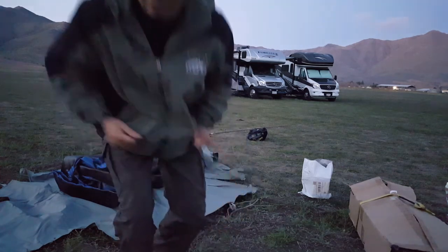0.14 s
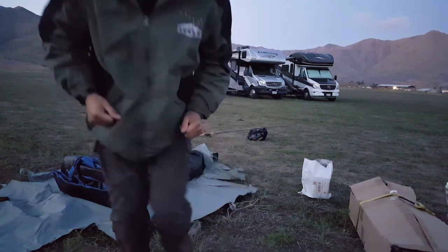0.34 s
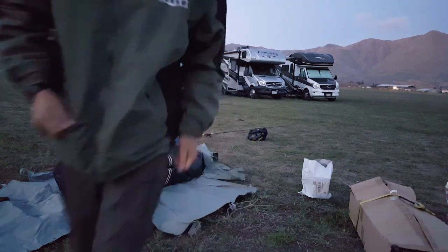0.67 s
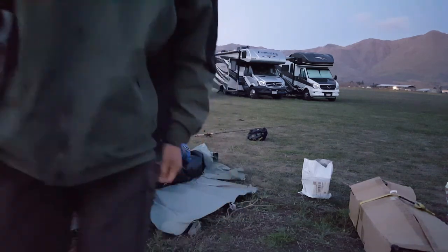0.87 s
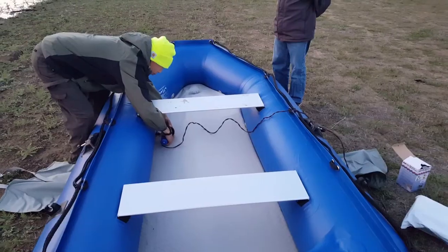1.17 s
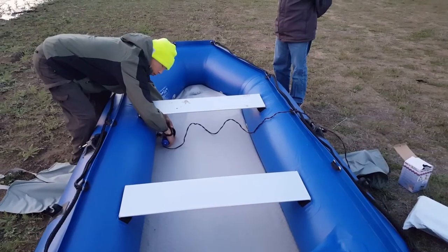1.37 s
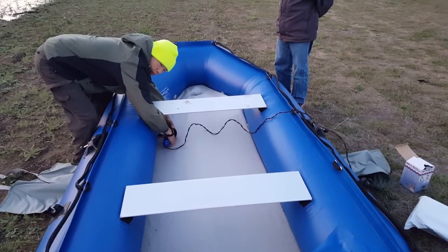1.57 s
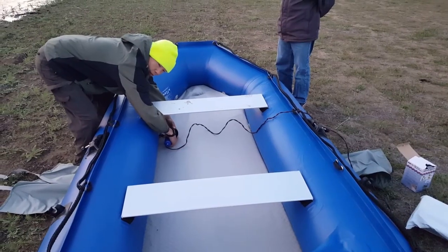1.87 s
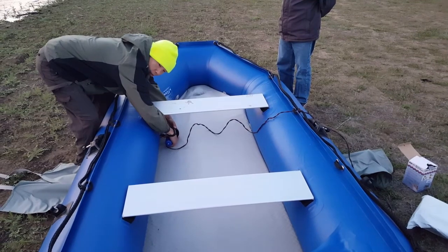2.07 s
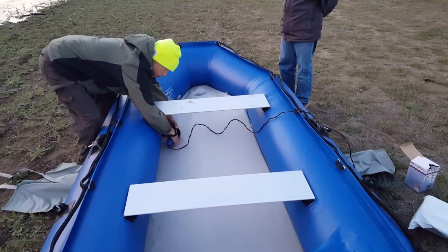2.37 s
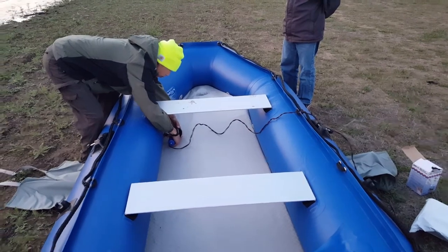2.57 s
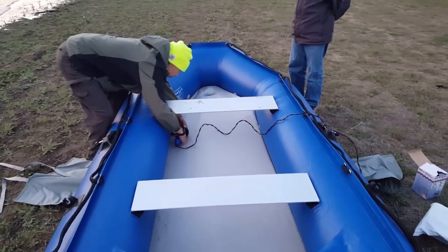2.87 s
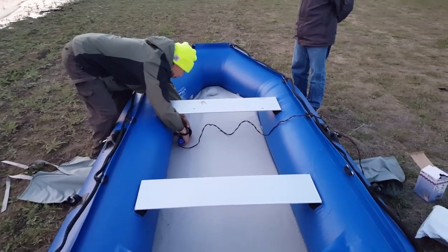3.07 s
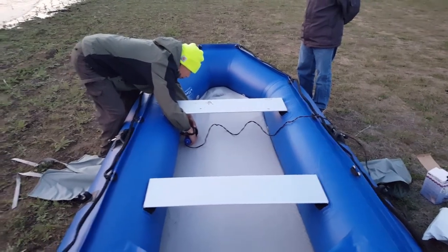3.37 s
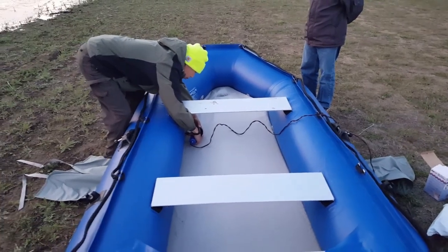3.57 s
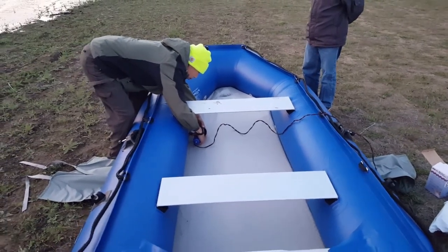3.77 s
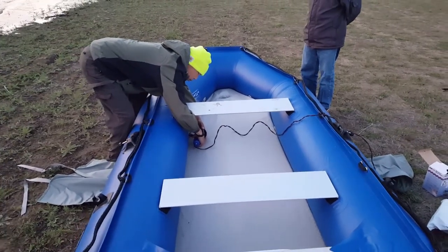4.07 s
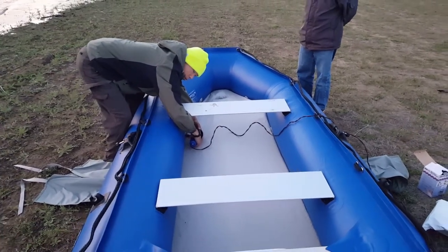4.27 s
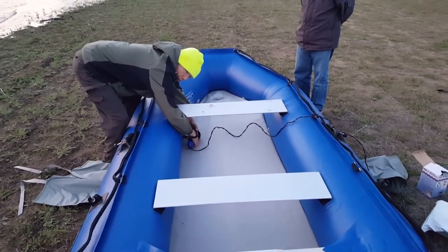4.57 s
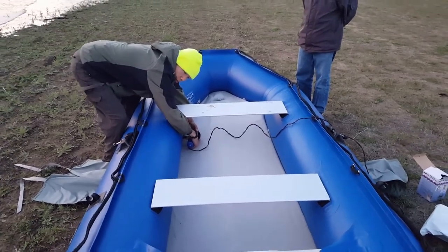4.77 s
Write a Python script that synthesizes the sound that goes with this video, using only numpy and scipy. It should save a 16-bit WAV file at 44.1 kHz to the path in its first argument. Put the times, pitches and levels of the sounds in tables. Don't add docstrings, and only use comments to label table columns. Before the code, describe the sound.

Open field, close hand-held stereo. From 0 to 1.1 s it is quiet: low outdoor air, clothing brushing at about 0.3, 0.5 and 0.8 s, a cluster of dull steps and knocks on a tarpaulin at 0.15-0.33 s, a bright dry tick near 0.58 s, and more soft knocks at 0.75-0.9 s. After a tiny near-silent gap, at 1.12 s a small electric blower cuts in abruptly, far louder and already at speed. A piercing main whine near 5.7 kHz, with lower hums and thinner whistles above 11 kHz, creeps up barely in pitch, fading and beating separately left and right as the view sways. Turbulent air booms hollowly in the rubber hull, with a rough nozzle whistle and a hose tone surging more strongly after 2.4 s. Low wind flutters throughout, with dull pops mostly left, especially at 3.2-3.7 s. The blower is still running at the end.

```python
import sys
import numpy as np
from scipy import signal
from scipy.fft import rfft, irfft, next_fast_len
from scipy.io import wavfile
from scipy.ndimage import map_coordinates

SR = 44100
rng = np.random.default_rng(int(sys.argv[2]) if len(sys.argv) > 2 else 0)


def materialize(psi):
    bounded = np.clip(np.atleast_2d(psi).T, -1, 1)
    quanta = np.round(bounded * 32767).astype(np.int16)
    wavfile.write(sys.argv[1], SR, quanta)


def decibels_to_gain(level_db):
    exponent = np.asarray(level_db, float) / 20
    return 10 ** exponent


N = 217796

CUT_OUT_S, CUT_IN_S = 1.1125, 1.1242
TURN_S = (2.1, 3.3)

# frequency in Hz, left and right in dB per Hz, left-right likeness.
FIELD_COLOUR = [(30, -99, -86, 0.18), (59.6, -77, -75, 0.95), (98, -73, -74, 0.9), (161, -81, -81.5, 0.92),
                (400, -82.5, -83, 0.86), (804, -85.5, -86.5, 0.41), (1810, -89, -92.5, 0.045),
                (3420, -99.0, -99, -0.4), (4960, -100, -101, -0.63), (7160, -101, -104, -0.53),
                (8600, -102, -108, 0.15), (10000, -110, -118, 0.17), (13500, -108.4, -112, -0.081),
                (14400, -107, -110, -0.13)]
# time in seconds, half-length in seconds, peak in dB.
RUSTLES = [
    (.03, 0.04, -72),
    (.3, 0.016, -68),
    (.35, 0.035, -72.5),
    (.49, 0.048, -72.5),
    (.578, 0.0041, -73),
    (.75, 0.041, -68),
    (.83, 0.052, -68.5),
    (1.06, 0.056, -70.5),
]
# time in seconds, peak in dB, ring in Hz, left over right in dB.
KNOCKS = [(.1420, -39, 600, 1), (.1688, -43, 1150, 1.5), (.2395, -45, 380, 1), (.2862, -43, 1500, 1.5),
          (.2912, -39.5, 520, 1.5), (.2965, -42, 520, 1.5), (.3090, -42, 400, 1), (.3310, -43, 380, .5),
          (.5765, -46, 1300, 0), (.2925, -47, 4500, 1), (.858, -44, 750, 0), (.742, -46, 250, 0),
          (.842, -44, 420, 0), (.892, -45, 520, 0)]
# time in seconds, peak in dB, ring in Hz, left over right in dB.
TWANGS = [
    (.166, -46, 1250, 1.5),
    (.2, -50, 1400, 1),
    (.828, -48, 1750, 0),
    (.834, -48, 1780, 0),
]
# time in seconds, peak in dB.
TICKS = [
    (.5755, -45),
]

# frequency in Hz, left and right in dB per Hz, left-right likeness.
WIND_COLOUR = [(14.2, -94, -94, .3), (33.2, -93, -94, -0.14), (60, -88, -84, 0.2),
               (102, -81.5, -82.5, 0.062), (140, -85.5, -87.5, 0.16), (173, -86.5, -88.5, 0.17),
               (272, -87.5, -90, 0.45), (330, -90.5, -99, .4), (395, -105.5, -109.5, 0.31)]
# time in seconds, peak in dB, left over right in dB.
GUSTS = [(1.2, -60, -4), (1.46, -58.5, -14), (1.63, -59, -7), (1.87, -67.5, -14), (1.98, -62, -18),
         (2.32, -64, 7), (2.5, -73, 5), (2.75, -64, 16), (2.85, -53.5, -2), (2.97, -57, 1), (3.2, -73, 10),
         (3.31, -58, 14), (3.41, -55.5, 10), (3.56, -57, 8), (3.7, -60, 3), (3.83, -64, 3), (3.93, -61, -2),
         (4.14, -61, -7), (4.25, -57.5, -5), (4.46, -55.5, 6), (4.68, -65, -9), (4.87, -59, -8)]
# time in seconds, half-length in seconds, depth in dB.
LULLS = [
    (1.362, .04, 4),
    (1.737, 0.05, 11),
    (2.123, 0.045, 14),
    (2.55, .04, 11),
    (3.1, 0.057, 12),
    (4.0, .04, 4),
    (4.603, .04, 6),
    (4.75, 0.041, 26),
]
# time in seconds, peak in dB, ring in Hz, left over right in dB.
POPS = [(1.5, -52, 190, 14), (2.01, -52, 201, 12), (2.86, -55, 180, 12), (3.198, -46, 220, 20),
        (3.265, -43.5, 225, 27.5), (3.3, -52, 420, 15), (3.41, -51, 250, 27), (3.529, -46, 190, 14),
        (3.569, -51, 211, 12), (3.614, -49.5, 191, 24), (3.69, -42, 180, 18), (3.74, -53, 300, 15)]

# frequency in Hz, left and right in dB per Hz, left-right likeness.
AIR_COLOUR = [(387, -86, -84, 0.72), (540, -79.5, -80.5, 0.91), (754, -69.5, -69.5, 1),
              (1060, -77, -76, 0.99), (1348, -72.5, -70.5, 0.98), (1576, -81, -78, 0.47),
              (1680, -79, -79, .5), (1850, -75.5, -76.5, 0.89), (2390, -74.5, -75, 0.68),
              (3290, -75, -76.5, 0.78), (3520, -80, -78, 0.46), (3930, -81.5, -83.5, 0.11),
              (6460, -85.5, -78, 0.58), (8150, -77.5, -87, 0.19), (9380, -90.5, -111, 0.15),
              (11900, -85, -98, 0.36), (13260, -84.5, -86, 0.28)]
# time in seconds, level in dB.
FLOW = [(1.13, -50.5), (1.66, -44), (1.75, -48), (2.2, -47), (2.7, -46), (2.99, -45), (3.18, -47.5),
        (3.21, -44), (3.92, -43.5), (4.11, -47.5), (4.3, -45), (4.33, -52), (4.41, -42.5), (4.93, -46)]
FLOW_SHARES = [0.93, 0.026, 0.021, 0.16]
# time in seconds, half-length in seconds, rise in dB.
ROAR_SWELLS = [
    (1.58, 0.074, 0.5),
    (3.59, 0.16, 3.5),
    (3.1, 0.12, 0),
    (4.6, 0.18, -1.5),
]
# time in seconds, lag in samples.
AIR_LAG = [(1.1, 2.9), (3.0, 2), (3.5, 0.61), (4.9, 2.7)]
# time in seconds, level in dB.
NOZZLE = [(1.1, -47), (2.4, -50), (3.0, -50), (4.9, -52)]
# time in seconds, pitch in Hz, steady level in dB.
HOSE = [(1.13, 1152, -60), (1.32, 1146, -54), (1.44, 1170, -58), (1.54, 1140, -54), (1.68, 1140, -53),
        (1.94, 1156, -54), (2.36, 1138, -64), (2.48, 1158, -61), (2.7, 1138, -53), (2.9, 1153, -54.5),
        (3.5, 1150, -49.5), (3.9, 1149, -49.5), (4.15, 1154, -49.5), (4.5, 1157, -47), (4.94, 1157, -50.5)]
# time in seconds, peak in dB.
SURGES = [(1.27, -48), (1.33, -45), (1.365, -50), (1.41, -55), (1.53, -46), (1.6, -45), (1.69, -47),
          (1.76, -48), (2.125, -43.5), (2.22, -46), (2.38, -44.5), (2.47, -41.5), (2.63, -41.5),
          (2.69, -42.5), (2.79, -47), (2.94, -40.5), (3.06, -54), (3.15, -42), (3.26, -39.5), (3.31, -42),
          (3.385, -46), (3.47, -44), (3.55, -49), (3.61, -40.5), (3.67, -41), (3.73, -47), (3.796, -40),
          (3.91, -41.5), (3.97, -37.5), (4.08, -45), (4.27, -43), (4.36, -43.5), (4.45, -37), (4.42, -46),
          (4.55, -39.5), (4.58, -48), (4.66, -48), (4.719, -40.5), (4.83, -44), (4.93, -45)]
# time in seconds, level in dB.
HALO = [
    (1.13, -65),
    (1.3, -52),
    (1.65, -48.5),
    (1.9, -55),
    (2.45, -52.5),
    (2.8, -52.5),
    (4.94, -51),
]

# time in seconds, base rate in Hz.
SPEED = [(1.14, 140.73), (1.34, 140.94), (1.54, 141.23), (1.74, 141.52), (2.14, 141.99), (2.34, 142.28),
         (2.54, 142.52), (2.73, 142.73), (2.93, 142.95), (3.13, 143.2), (3.53, 143.48), (3.73, 143.68),
         (4.13, 143.93), (4.33, 144.07), (4.53, 144.21), (4.73, 144.39), (4.85, 144.47), (4.93, 144.43)]
# order, left and right level in dB, left lead in radians, waver in dB.
ORDERS_WEAK = [
    (1.5, -63.5, -62, .3, 2.4),
    (2, -60, -58.5, .15, 1.4),
    (5, -60, -60, 0, 2),
    (20, -58, -58.5, 1.5, 2.5),
    (25, -65, -64, 0, 2.5),
    (45, -68, -63, 2.3, 2.5),
    (34, -70, -62, 1.9, 4),
]
# order, left and right level in dB, left lead in radians before and after the turn.
ORDERS_STRONG = [
    (10, -46.5, -47.5, -.15, 1.7),
    (15, -49.5, -50, .5, -.1),
    (16, -53.5, -51, 1.2, .6),
    (18, -53, -54, .5, .9),
]
# start in seconds, end in seconds.
LEAD_SWINGS = [(3.3, 4), (1.7, 8.4), (1.4, 2.6), (4.3, 4.9)]
# order, time and half-length in seconds, left and right loss in dB.
SHADES = [(10, 1.2, .25, 4, 13), (10, 2.1, .2, -1, 3), (10, 4.2, .4, 1, 4), (10, 4.85, .2, -3, 7),
          (10, 2.4, .1, 2, 2), (15, 1.2, .4, 2, 12), (15, 2.5, .5, 4, 8), (15, 2.0, .15, -4, 0),
          (15, 3.15, .12, 2, 4), (15, 3.7, .3, -1, -1), (15, 4.1, .3, 2, 4), (15, 4.65, .25, 6, 5),
          (16, 1.3, .3, 10, 6), (16, 2.0, .5, 3, 2), (16, 3.35, .12, -3, -2), (16, 4.3, .15, 2, 6),
          (16, 4.75, .2, 1, 4), (18, 1.5, .15, 4, 4), (18, 2.7, .3, 5, 5), (18, 4.2, .4, 4, 4),
          (18, 4.9, .3, 1, 3)]
# time in seconds, level in dB.
LATE_ORDER = [(1.2, -66), (2.8, -65), (3.3, -61), (4.0, -62), (4.3, -56), (4.9, -56)]
# time in seconds, left and right level in dB, left lead in radians.
HIGH_80 = [(1.13, -43, -62, -1.8), (1.27, -42, -62, -2.2), (1.45, -49, -53, -2.2), (1.57, -45, -50, -2.8),
           (1.72, -41, -56, -1.4), (1.89, -45, -44, -0.3), (2.2, -49, -45, -1.0), (2.45, -43, -42, -1.0),
           (2.7, -45, -53, -0.6), (2.74, -47, -55, 2.4), (2.82, -54, -49, 2.8), (2.9, -43, -51, 2.9),
           (3.34, -47, -46, 1.4), (3.42, -46, -52, 0.8), (3.51, -42, -49, 0.3), (3.61, -41, -61, 0.8),
           (4.09, -40, -46, 2.8), (4.55, -44, -54, 1.4), (4.7, -44, -51, 2.1), (4.79, -48, -55, 3.0),
           (4.87, -52, -48, 3.2), (4.93, -51, -53, 2.8)]
# time in seconds, left and right level in dB, left lead in radians.
HIGH_90 = [(1.13, -48, -59, 0.7), (1.42, -45, -49, 2.0), (1.56, -42, -57, 1.3), (1.96, -47, -50, 2.6),
           (2.23, -50, -56, 1.7), (2.29, -46, -63, 1.9), (2.63, -44, -52, 1.9), (2.86, -47, -59, 0.4),
           (3.04, -54, -64, 1.4), (3.11, -64, -64, 1.3), (3.21, -58, -56, 1.2), (3.28, -64, -64, 0.7),
           (3.36, -58, -58, 3.3), (3.52, -51, -64, 3.6), (3.71, -58, -51, 5.3), (3.83, -50, -53, 5.4),
           (4.09, -48, -48, 6.6), (4.41, -62, -48, 6.4), (4.56, -52, -49, 6.0), (4.76, -55, -49, 7.2),
           (4.87, -64, -48, 6.1), (4.93, -62, -47, 5.7)]
# time in seconds, left and right level in dB.
SWAY = [(1.132, -37.4, -38.3), (1.279, -39.9, -35.7), (1.52, -41.2, -43.2), (1.707, -42.0, -39.1),
        (1.841, -53.6, -35.8), (2.09, -34.5, -37.8), (2.309, -44.5, -32.5), (2.521, -40.6, -33.0),
        (2.648, -41.0, -30.0), (2.856, -42.4, -34.6), (3.099, -52.0, -33.5), (3.314, -44.5, -31.0),
        (3.514, -52.3, -38.6), (3.716, -41.6, -40.3), (4.11, -41.8, -35.1), (4.264, -43.1, -35.9),
        (4.639, -43.3, -35.4), (4.939, -51.6, -42.2)]
# time in seconds, lead in radians.
WHINE_LEAD = [(1.135, -1.5), (1.296, -2.8), (1.48, -2.4), (1.54, 1.6), (1.755, 1.0), (1.9, -6.8),
              (2.086, -9.3), (2.219, -10.8), (2.326, -15.4), (2.52, -15.8), (2.826, -16.9), (2.861, -18.0),
              (2.96, -21.0), (3.036, -26.5), (3.122, -28.0), (3.4, -27.8), (3.556, -25.3), (3.686, -29.1),
              (3.745, -29.7), (4.052, -29.5), (4.2, -29.2), (4.527, -29.5), (4.917, -30.0)]
# time in seconds, echo over direct in dB.
NULLS_LEFT = [(1.143, -18.5), (1.227, -22.0), (1.403, -7.1), (1.732, -1.9), (1.799, -22.0), (1.859, -4.5),
              (1.967, -20.0), (2.289, -17.2), (2.364, -8.9), (2.618, -13.8), (2.769, -5.3), (2.861, -15.1),
              (3.0, -15.4), (3.063, -2.3), (3.186, -0.8), (3.198, -12.5), (3.44, -3.0), (3.662, -15.7),
              (4.105, -1.4), (4.357, -22.0), (4.416, -2.6), (4.667, -11.7), (4.717, -5.7), (5.087, -0.3)]
# time in seconds, echo over direct in dB.
NULLS_RIGHT = [(0.883, -19.2), (1.256, -0.3), (1.486, -0.9), (1.806, -3.4), (2.003, -20.3), (2.077, -0.3),
               (2.317, -2.7), (2.534, -10.8), (2.655, -8.8), (2.837, -0.6), (3.004, -22.0), (3.13, -8.2),
               (3.227, -19.8), (3.464, -17.1), (3.577, -14.2), (3.618, -9.2), (3.885, -9.4), (4.045, -13.5),
               (4.209, -11.1), (4.519, -8.5), (4.728, -11.7), (4.795, -5.1), (5.033, -0.3)]
# frequency in Hz, left and right gain in dB.
PORTS = [(4600, 0, 0), (5100, 0, 3), (5600, 0.5, 1.1), (5800, 0.7, 0.3), (5960, 3.5, 0.0), (6220, 7.0, 0.5),
         (6610, 2.0, -1.5), (6960, -2.5, 1.5), (7080, -0.5, 5.0), (7280, 4.0, 2.5), (7620, 0.5, -2.5),
         (7950, 1.5, 1.5), (8420, 1.5, 1.0), (8720, 3.0, -10.5), (9020, 3.5, -12.5), (9220, 2.0, -9.5),
         (9430, -3.5, -16.5), (9670, -0.5, -4.0), (9910, -3.0, -10.5), (10120, -6.5, -5.0),
         (10310, -4.5, -10.0), (10490, 2.0, -11.5), (10900, -3.5, -20.5), (10960, -4.0, -18.0),
         (11050, -3.5, -7.0), (11130, -1.5, -4.0), (11630, -1.5, -5.0), (11910, -7.0, -5.5),
         (12300, -5.0, -13.5), (12450, -4.0, -7.0), (13240, -0.5, 2.0), (14380, 5.0, 0.5)]


def in_time(rows):
    s, *columns = np.transpose(rows)
    return np.array([np.interp(np.arange(N) / SR, s, c) for c in columns])


def drift(rate):
    r = np.exp(-80 * np.pi * rate / SR)
    noise = rng.standard_normal(N // 40 + 2002)
    slow = signal.lfilter([1], [1, -2 * r, r * r], noise)[2000:]
    return np.interp(np.arange(N) / 40, np.arange(len(slow)), slow / slow.std())


def bell(s, half_s):
    return np.exp(-((np.arange(N) / SR - s) / half_s) ** 2)


def swells(events, bed_db):
    power = sum(decibels_to_gain(db) ** 2 * bell(s, half_s) for s, half_s, db in events)
    return 10 * np.log10(decibels_to_gain(bed_db) ** 2 + power)


def turned(before, after):
    return np.interp(np.arange(N) / SR, TURN_S, [before, after])


def take(second):
    cut = round(CUT_IN_S * SR)
    return slice(cut - 20, N) if second else slice(0, cut)


def band_pass(x, low_hz, high_hz):
    return signal.sosfilt(signal.butter(2, [low_hz, high_hz], "band", fs=SR, output="sos"), x)


def coloured(colour, zones_hz, zones_db, patchy_db, flicker_hz, span, pan_db=0):
    count = span.stop - span.start
    size = next_fast_len(count)
    octave = np.log2(np.fft.rfftfreq(size, 1 / SR) + 1)
    at, *columns = np.transpose(colour)
    at = np.log2(at)
    left, right, alike = [np.interp(octave, at, c) for c in columns]
    alike = np.clip(alike, -1, 1)
    mid, side = rfft(rng.standard_normal((2, size)))
    pair = np.sqrt(1 + alike) * mid + np.sqrt(1 - alike) * side * [[1], [-1]]
    pair = pair * decibels_to_gain(np.array([left, right])) * np.sqrt(SR / 4)
    inside = np.clip(np.minimum(octave - at[0], at[-1] - octave) * 5 + 1, 0, 1)
    change_db = zones_db[:, span] - zones_db[:, span].mean(axis=1, keepdims=True)
    out = np.zeros((2, N))
    for centre in np.arange(at[0], at[-1] + .5, .5):
        share = np.clip(1 - 2 * np.abs(octave - centre), 0, 1)
        weights = [np.interp(centre, np.log2(zones_hz), row) for row in np.eye(len(zones_hz))]
        level_db = weights @ change_db + patchy_db * drift(flicker_hz)[span]
        out[:, span] += decibels_to_gain(level_db) * irfft(pair * inside * share, size)[:, :count]
    return out * decibels_to_gain(pan_db * np.array([[.5], [-.5]]))


def bumps(events, decay_s, spread):
    out, t = np.zeros((2, N)), np.arange(2200) / SR
    for s, db, hz, pan_db in events:
        puff = rng.standard_normal((2, len(t))) * np.exp(-t / decay_s)
        click = 12.0 * (t == 0)
        body = band_pass(puff[0] + .4 * puff + click, hz / spread, hz * spread)
        sides = decibels_to_gain(db + pan_db * np.array([[.5], [-.5]]))
        out[:, round(s * SR):][:, :len(t)] += sides * body / np.abs(body).max()
    return out


def passer_by():
    rustle_db = swells(RUSTLES, bed_db=-78)
    rumble_db = 5 * np.arange(N) / SR
    levels_db = np.array([rumble_db, 0.18 * rustle_db, rustle_db])
    return coloured(FIELD_COLOUR, [80, 800, 7000], levels_db, 0.88, 22, take(False))


def knocks():
    out = bumps(KNOCKS, .003, 1.5) + bumps(TWANGS, .005, 1.12)
    t = np.arange(600) / SR
    for s, db in TICKS:
        tick = band_pass(rng.standard_normal((2, len(t))), 5000, 10500) * np.exp(-t / 0.0035)
        out[:, round(s * SR):][:, :len(t)] += decibels_to_gain(db - 4) * tick
    return out


def wind():
    left, right = [swells([(s, 0.054, db + side * pan_db) for s, db, pan_db in GUSTS], bed_db=-60)
                   for side in (.5, -.5)]
    lull_db = sum(db * bell(s, half_s) for s, half_s, db in LULLS)
    level_db = (left + right) / 2 - lull_db
    pan_db = left - right
    return coloured(WIND_COLOUR, [100], level_db[None], 3.5, 12, take(True), pan_db - np.mean(pan_db))


def wind_pops():
    return bumps(POPS, 0.013, 1.5)


def airflow():
    levels_db = np.outer(FLOW_SHARES, in_time(FLOW)[0])
    levels_db[1] += sum(db * bell(s, half_s) for s, half_s, db in ROAR_SWELLS)
    levels_db[:3] += 0.96 * drift(35)
    pan_db = turned(-0.9, -2)
    left, right = coloured(AIR_COLOUR, [760, 2300, 3500, 7500], levels_db, 0.75, 21.0, take(True),
                           pan_db - pan_db.mean())
    heard_at = np.arange(N) - in_time(AIR_LAG)[0]
    return np.array([left, map_coordinates(right, [heard_at], order=3, mode="nearest")])


def nozzle():
    noise = rng.standard_normal((2, N))
    rush = band_pass(noise[0] + .5 * noise, 2400, 2620)
    return decibels_to_gain(in_time(NOZZLE)[0]) * rush / rush.std()


def order(turns, multiple, levels_db, lead):
    phase = 2 * np.pi * (multiple * turns + rng.random())
    return np.sqrt(2) * decibels_to_gain(levels_db) * np.array([np.sin(phase + lead), np.sin(phase)])


def hose_tone():
    hz, steady_db = in_time(HOSE)
    level_db = swells([(s, 0.022, db) for s, db in SURGES], steady_db)
    turns = np.cumsum(hz + 3.17 * drift(20.0)) / SR
    tone = order(turns, 1, level_db + 0.4 * drift(3.9) + [[-.6], [.6]], 0.084)
    halo = band_pass(rng.standard_normal(N), 1115, 1190)
    return tone + decibels_to_gain(in_time(HALO)[0]) * halo / halo.std()


def weak_orders(turns):
    late_db = in_time(LATE_ORDER)[0] + 3.0 * drift(9)
    out = order(turns, 36, late_db + [[-9], [0]], 1.9)
    for multiple, left_db, right_db, lead, waver_db in ORDERS_WEAK:
        waver = waver_db * (drift(3) + .5 * np.array([drift(2), drift(2)]))
        out += order(turns, multiple, waver + [[left_db], [right_db]], lead + .2 * drift(1))
    return out


def strong_orders(turns):
    out = np.zeros((2, N))
    for (multiple, left_db, right_db, *lead), swing_s in zip(ORDERS_STRONG, LEAD_SWINGS):
        loss_db = sum(np.outer(loss, bell(s, half_s)) for k, s, half_s, *loss in SHADES if k == multiple)
        levels_db = 0.8 * drift(6.9) + [[left_db], [right_db]] - loss_db
        out += order(turns, multiple, levels_db, np.interp(np.arange(N) / SR, swing_s, lead))
    return out


def high_whines(turns):
    out = np.zeros((2, N))
    for multiple, rows in ((80, HIGH_80), (90, HIGH_90)):
        *levels_db, lead = in_time(rows)
        out += order(turns, multiple, np.array(levels_db) + 1.0 * drift(12), lead)
    return out


def two_paths(nulls):
    cycles, echo_db = in_time([(s, k, db) for k, (s, db) in enumerate(nulls)])
    return 1 - decibels_to_gain(echo_db) * np.exp(-2j * np.pi * cycles)


def main_whine(turns):
    paths = np.array([two_paths(NULLS_LEFT), two_paths(NULLS_RIGHT)])
    phase = 2 * np.pi * 40 * turns + in_time(WHINE_LEAD) * [[1], [0]]
    levels_db = in_time(SWAY) + .3 * drift(5.2)
    return np.sqrt(2) * decibels_to_gain(levels_db) * np.real(paths * np.exp(1j * phase))


def rotor():
    turns = np.cumsum(in_time(SPEED)[0]) / SR
    return weak_orders(turns) + strong_orders(turns) + high_whines(turns) + main_whine(turns)


def ports(heard):
    size = next_fast_len(N)
    hz = np.fft.rfftfreq(size, 1 / SR)
    at, *gains_db = np.transpose(PORTS)
    gains = decibels_to_gain(np.array([np.interp(hz, at, g) for g in gains_db]))
    return irfft(rfft(heard, size) * gains, size)[:, :N]


def scene():
    t = np.arange(N) / SR
    first = passer_by() + knocks()
    second = wind() + wind_pops() + nozzle() + hose_tone() + ports(airflow() + rotor())
    fade_out = np.clip((CUT_OUT_S - t) / 0.00057, .05, 1) * (t < CUT_IN_S)
    fade_in = np.clip((t - CUT_IN_S) / .0003 + .5, 0, 1)
    return first * fade_out + second * fade_in


def top_cut(x):
    return signal.sosfilt(signal.butter(12, 14560, fs=SR, output="sos"), x)


def record(dry):
    return top_cut(dry)


dry = scene()
out = record(dry)
materialize(out)
```